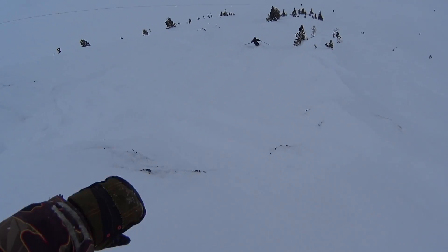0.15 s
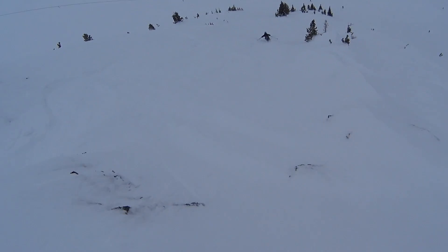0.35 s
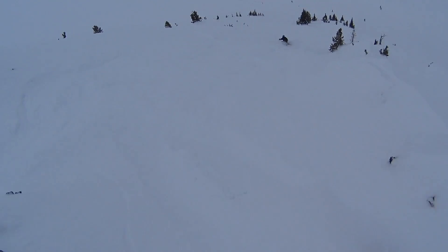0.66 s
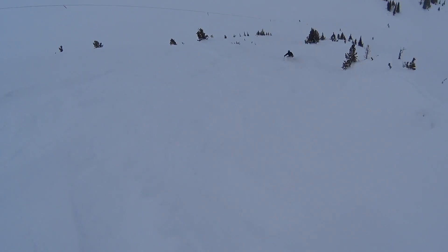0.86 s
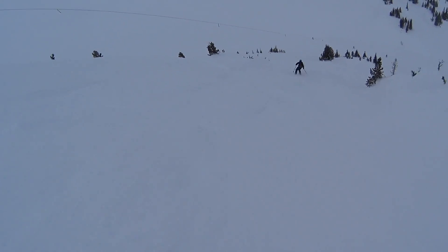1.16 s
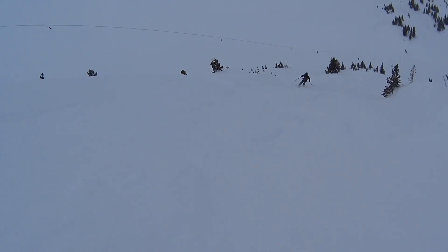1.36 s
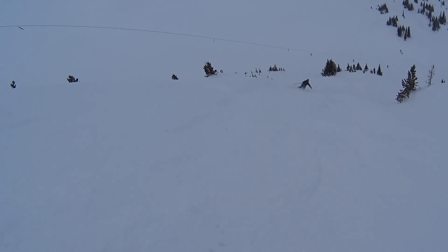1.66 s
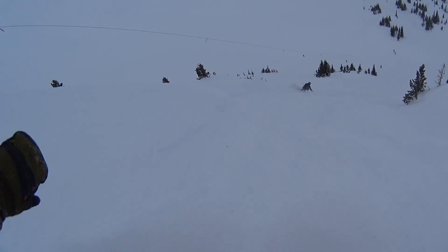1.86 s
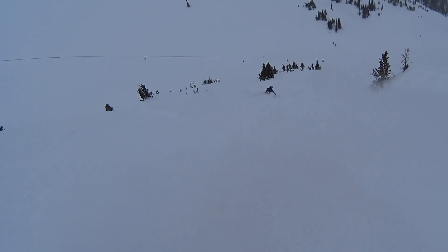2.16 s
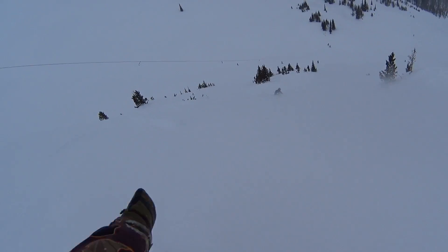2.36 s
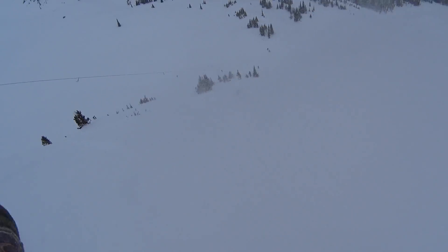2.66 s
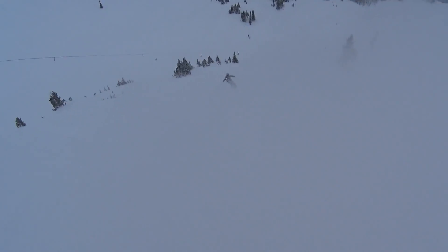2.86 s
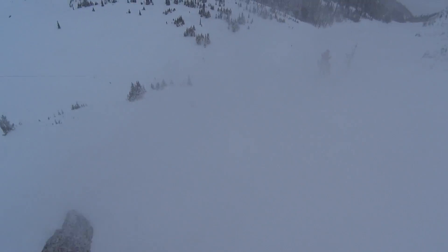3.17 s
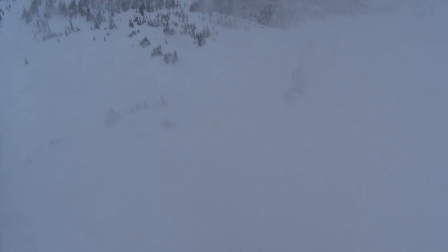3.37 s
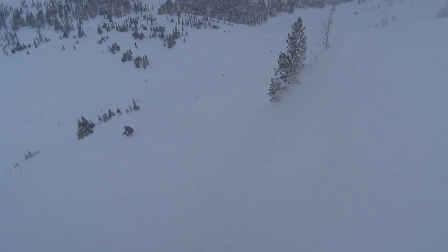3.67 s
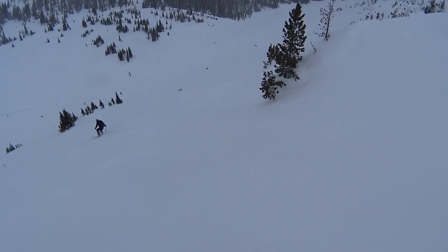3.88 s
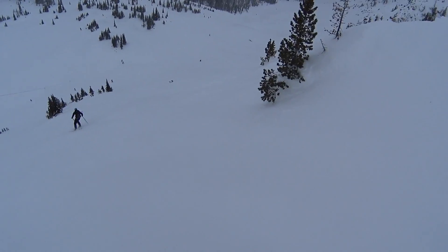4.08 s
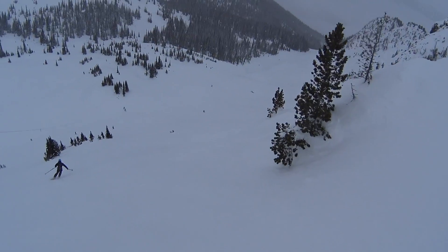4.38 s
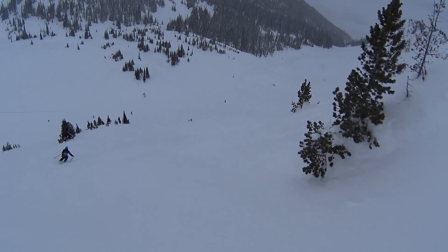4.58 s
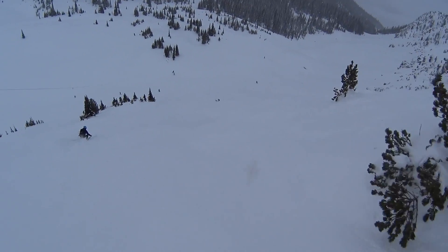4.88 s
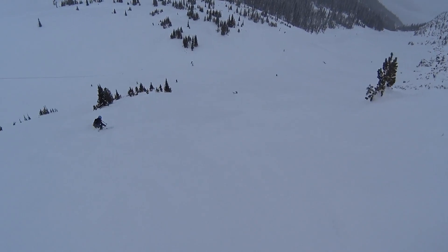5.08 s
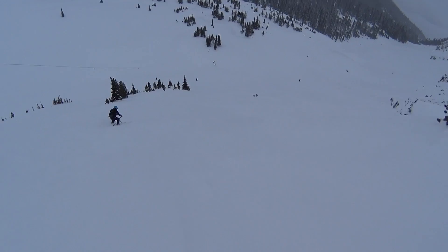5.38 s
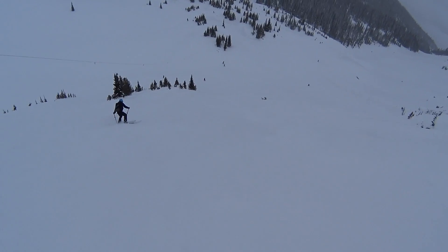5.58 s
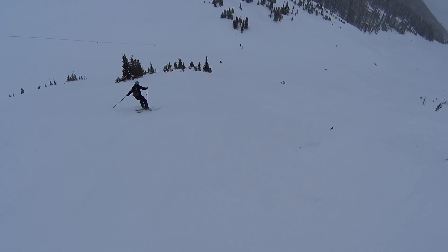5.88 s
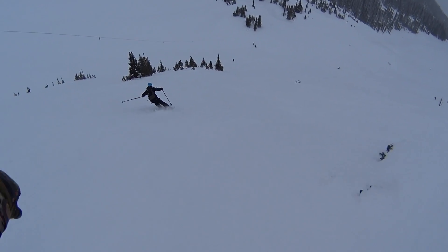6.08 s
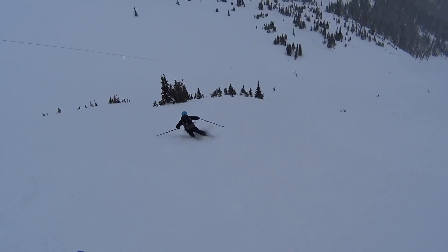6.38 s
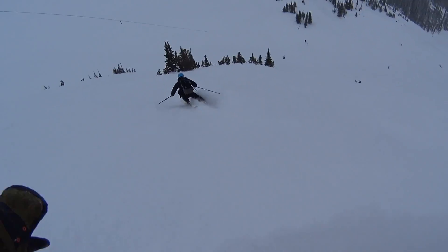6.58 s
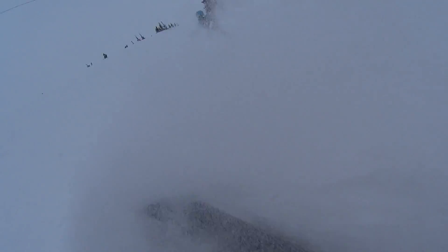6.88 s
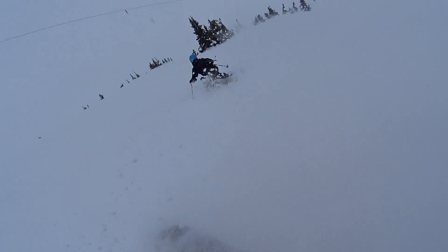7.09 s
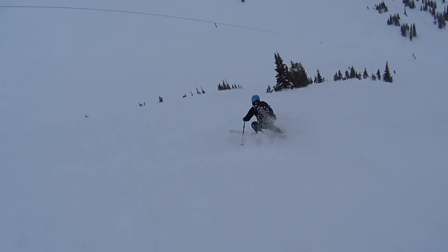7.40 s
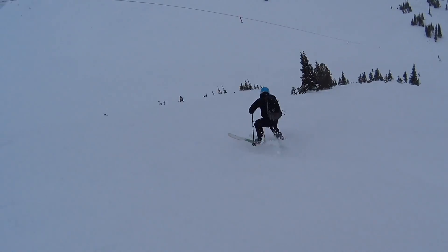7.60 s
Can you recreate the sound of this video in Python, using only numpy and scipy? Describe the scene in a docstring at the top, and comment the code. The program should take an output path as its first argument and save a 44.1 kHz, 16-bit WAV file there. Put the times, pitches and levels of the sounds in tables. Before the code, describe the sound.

Skiing through deep powder, heard from a body-worn camera in a plastic case. Swishing rumble follows the speed and each turn hisses. Plastic ticks and knocks come early; around three seconds snow pellets crackle sharply over the microphones. A quieter glide follows, then speed builds to a heavy thump at six and a half seconds, more knocks and a short spray. Open slope, no echo, faint low wind.

```python
"""Open slope, no echo: skiing through deep powder with a body-worn camera in a plastic case.
The skis rumble and swish (coloured noise that follows the speed); each turn throws up hissing powder.
Over bumps the camera mount knocks and rattles (damped modes struck by short forces).
Twice the skier rides through a cloud of snow that pelts the case and the microphone ports.
A faint low wind stays under it all; a limiter ducks after hard hits."""
import sys
import numpy as np
from scipy import signal
from scipy.fft import rfft, irfft
from scipy.io import wavfile
from scipy.ndimage import uniform_filter1d, minimum_filter1d

SR = 44100
rng = np.random.default_rng(int(sys.argv[2]) if len(sys.argv) > 2 else 0)


def unload_audio(sound):
    """Save the sound as a 16-bit wav file, at the path given as the first command line argument."""
    columns = np.transpose(np.atleast_2d(sound))
    # keep every value between -1 and 1, then stretch to whole-number steps
    steps = np.round(np.clip(columns, -1, 1) * 32767)
    wavfile.write(sys.argv[1], SR, steps.astype(np.int16))


N = 341334

# Ringing modes of the plastic case. Each row: frequency in Hz, relative level in dB, t60 in seconds.
CASE_MODES = [(970, -6.5, 0.011), (1347, 0.5, 0.013), (1622, 4.5, 0.016), (1859, 1.5, 0.014),
              (2424, -1, 0.016)]
# Ringing modes of a microphone port. Each row: frequency in Hz, relative level in dB, t60 in seconds.
PORT_MODES = [(2550, -6.5, 0.0095), (3740, 3.5, 0.0018), (4610, 2, 0.0029), (6460, -3, 0.0014),
              (10530, -17, 0.0068), (13400, -21.5, 0.0023)]
# Clouds of powder ridden through. Each row: start in seconds, end in seconds,
# relative level of pellets on the ports in dB, relative level of fine snow on the case in dB.
CLOUDS = [(2.899, 3.291, -8, -37), (3.319, 3.6, -2.5, -32.5), (3.62, 3.882, -5, -38),
          (7.039, 7.098, -5, -32)]


def gain_of(db):
    """Decibels to amplitude."""
    return 10 ** (np.asarray(db) / 20)


def evened(x):
    """Scaled to rms 1."""
    return x / np.sqrt(np.mean(x ** 2) + 1e-20)


def peaked(x):
    """Scaled to peak 1."""
    return x / (abs(x).max() + 1e-20)


def read(points, hz):
    """A spectrum read on a log-frequency axis."""
    f, value = np.transpose(points)
    return np.interp(np.log(hz + 1), np.log(f + 1), value)


def add(mix, s, sound):
    """Adds a sound to the stereo mix at time s."""
    part = mix[:, max(round(s * SR), 0):][:, :sound.shape[-1]]
    part += sound[..., :part.shape[1]]


def times(start, end, per_s, evenness=2.3):
    """Uneven moments between start and end, roughly per_s a second."""
    at = start + (np.cumsum(rng.weibull(evenness, 128)) - 0.5) / per_s
    return at[(at >= start) & (at < end)]


def fade_db(start, end, rise_db_per_s, fall_db_per_s):
    """Rises to 0 dB at start, holds until end and falls."""
    t = np.arange(N) / SR
    return -rise_db_per_s * np.maximum(start - t, 0) - fall_db_per_s * np.maximum(t - end, 0)


def ring(modes, stretch=1, size=4096):
    """The answer of a body to one blow: decaying sines of alternating sign, pitch scaled by stretch."""
    t = np.arange(size) / SR
    total = np.zeros(size)
    for k, (hz, db, t60) in enumerate(modes):
        decay = gain_of(db - 60 * t / t60)
        total += (-1) ** k * decay * np.sin(2 * np.pi * hz * stretch * t)
    return peaked(total)


def rush(colour, patchy_db, flutter_db, size=512):
    """Noise at two close ports, partly alike, with drifting spectral patches and a broadband flutter."""
    # Each row: frequency in Hz, left-right likeness from 0 to 1.
    alike = [(60, 0.98), (130, 1), (290, 0.99), (640, 0.88), (1410, 0.96), (3100, 1), (6820, 0.92),
             (15000, 1)]
    hop = size // 4
    hz, frames = np.fft.rfftfreq(size, 1 / SR), N // hop + 5
    a, b, c, d, patches = rng.standard_normal((5, frames, len(hz)))
    patches = evened(uniform_filter1d(uniform_filter1d(patches, size=14, axis=0), size=9, axis=1))
    flutter = evened(uniform_filter1d(rng.standard_normal(frames), size=6))[:, None]
    same = read(alike, hz)
    left = a + 1j * b
    right = same * left + np.sqrt(1 - same ** 2) * (c + 1j * d)
    level_db = read(colour, hz) + patchy_db * patches + flutter_db * flutter
    spectra = np.array([left, right]) * gain_of(level_db)
    noise = signal.istft(spectra.swapaxes(1, 2), nperseg=size, noverlap=size - hop)[1]
    return evened(noise[:, :N])


def wind(level_db=-55):
    """A faint low flutter of air brushing past the case, steady whatever the skis do."""
    # Each row: frequency in Hz, relative density in dB per Hz.
    wind_colour = [(20, 1), (75, 0), (140, -10.5), (400, -40), (1000, -70)]
    return gain_of(level_db) * rush(wind_colour, patchy_db=5.0, flutter_db=2.5, size=2048)


def lumps():
    """Soft lumps of snow shove the whole camera: a dull push with no ring."""
    # Each row: time in seconds, relative peak in dB, time constant of the push in seconds.
    shoves = [(3.176, -10, .0006), (3.4971, -11, .0011), (6.54, -12.5, 0.0026)]
    out = np.zeros((2, N))
    for s, db, push_s in shoves:
        u = np.arange(2048) / SR / push_s
        add(out, s, gain_of(db) * peaked(u * (2 - u) * np.exp(-u)))
    return out


def grains(modes, per_s, spread_db, across, count):
    """Snow grains of uneven size land left or right, on four spots that ring a little differently."""
    sizes = gain_of(spread_db * np.minimum(rng.exponential(1, (2, count)), 3))
    sizes = sizes * rng.choice([-1, 1], (2, count))
    landed = rng.random((2, count)) < per_s / SR
    hits = sizes * landed * signal.windows.tukey(count, 0.15)
    hits = hits + across * hits[::-1]
    spot = rng.integers(0, 4, count)
    total = 0
    for k, stretch in enumerate(rng.uniform(0.906, 1.119, size=4)):
        answer = ring(modes, stretch, size=512)[None]
        total = total + signal.fftconvolve(hits * (spot == k), answer, axes=1)
    return evened(total)


def showers(port_db=6.0, case_db=-2.0, fine_db=-35.0):
    """Fine snow patters on ports and case all through a cloud, and more loudly where a clump bursts."""
    # Clumps bursting over the camera. Each row: start in seconds, length in seconds,
    # relative level on the ports in dB, relative level on the case in dB.
    clumps = [(2.854, 0.071, -31.5, -25.5), (2.996, 0.057, -29.5, -34.5), (3.182, .031, -24, -25.5),
              (3.428, 0.065, -19, -28), (3.711, 0.032, -24, -26), (3.795, 0.099, -30.5, -33.5),
              (6.438, 0.019, -49, -19), (6.468, 0.024, -24.5, -7), (7.023, 0.12, -35.5, -24.5),
              (7.175, 0.027, -48, -22)]
    # Thin lens window, reached by snow only. Each row: frequency in Hz, relative level in dB, t60 in seconds.
    window_modes = [(2950, 0, 0.0093), (4700, 3, 0.0044)]
    out = np.zeros((2, N))
    drizzle = [(start, end - start, db + fine_db, on_case_db) for start, end, db, on_case_db in CLOUDS]
    for start, length_s, on_port_db, on_case_db in clumps + drizzle:
        count = max(round(length_s * SR), 256)
        on_port = grains(PORT_MODES, per_s=710, spread_db=8.0, across=0.061, count=count)
        add(out, start, gain_of(on_port_db + port_db) * on_port)
        on_case = grains(CASE_MODES + window_modes, per_s=1400, spread_db=9.5, across=0.72, count=count)
        add(out, start, gain_of(on_case_db + case_db) * on_case)
    return out


def pellets(level_db=0.5, far_db=-12.0, slosh_db=-3.0, thud=0.07, thud_s=0.00023, vary_db=2.0):
    """Each pellet pings a port with its own colour; the lowest mode is air sloshing to the other port."""
    # Pellets heard singly, hard and soft. Each row: time in seconds, relative level in dB.
    single = [(1.3586, -7), (2.8351, 3), (2.8565, 4), (2.918, 1), (2.9494, -2), (2.9789, 6), (3.0225, 1),
              (3.1376, 0), (3.3149, -5), (3.5204, 4), (3.6145, -4), (3.7, 4.5), (3.76, 3.5), (3.8982, -2)]
    rough_per_s, spread_db = 62, 3.5
    out, t = np.zeros((2, N)), np.arange(512) / SR
    hail = []
    for start, end, db, _ in CLOUDS:
        for s in times(start, end, rough_per_s):
            hail.append((s, db + spread_db * rng.standard_normal()))
    strikes = single + hail
    sides = rng.permutation(len(strikes)) % 2
    for (s, db), side in zip(strikes, sides):
        pitch, *colour = rng.standard_normal(1 + len(PORT_MODES))
        stretch = 1 + 0.03 * pitch
        modes = [(hz, mode_db + vary_db * c, t60) for (hz, mode_db, t60), c in zip(PORT_MODES, colour)]
        ping = ring(modes[1:], stretch, size=512)
        slosh = -gain_of(slosh_db + vary_db * colour[0]) * ring(modes[:1], stretch, size=512)
        # the thud grows faster than the ping: hard strikes thud more
        near = ping + slosh + thud * gain_of(db) * np.exp(-t / thud_s)
        far = gain_of(far_db) * (ping + np.roll(slosh, 6))  # slosh arrives 6 samples late
        pair = np.array([near, far] if side > 0 else [far, near])
        add(out, s, gain_of(db + level_db) * pair)
    return out


def clack(rebound, contact_s=0.0015, chatter=0.41, gap_s=0.00468, apart=0.32, soft_hz=3600, size=1024):
    """Plastic scrapes on plastic for an instant and rebounds once; the case rings."""
    t = np.arange(size) / SR
    length_s = contact_s * rng.uniform(0.84, 1.327)
    u = t / length_s
    late = np.maximum(t - gap_s * rng.uniform(0.72, 1.26), 0) / length_s
    contact = 2 * u * np.exp(-2 * u) + rebound * 2 * late * np.exp(-2 * late)
    scrape = rng.standard_normal(size) + apart * rng.standard_normal((2, size))
    force = 2 * chatter * contact * scrape
    force[:, np.argmax(contact)] += 1
    # plastic gives way: no sharp click
    force = signal.sosfilt(signal.butter(2, soft_hz, fs=SR, output="sos"), force)
    answer = ring(CASE_MODES, rng.uniform(0.916, 1.058), size=size)[None]
    return peaked(signal.fftconvolve(force, answer, axes=1))


def ticks(scratch_db=-21.0, scratch_growth=0.77, scratch_s=0.0035, low_hz=2600, high_hz=6000):
    """Loose gear ticks on the case, with a brief treble scratch that stands out more in faint ticks."""
    # Ticks heard singly, strong and faint. Each row: time in seconds, relative peak in dB.
    single = [(0.654, -9.5), (0.8145, -9.5), (1.0058, -5.5), (1.056, -5), (1.2993, -4), (1.317, -6),
              (1.3844, -5.5), (1.4513, -12.5), (2.2, -19), (2.4026, -17), (2.468, -20), (2.5238, -21.5),
              (2.5619, -18), (2.5836, -9), (2.6955, -12), (2.707, -5.5), (4.0298, -23.5), (4.082, -14),
              (4.187, -27), (4.2394, -21), (4.945, -19), (5.5549, -4.5), (5.9723, -10.5), (6.2344, -8.5),
              (6.369, -8), (6.511, -2.5), (6.5326, -5.5), (6.961, -10.5), (7.011, -5.5), (7.1271, -13),
              (7.215, -10.5), (7.304, -11.5), (7.3635, -15.5), (7.436, -14), (7.497, -7)]
    # Light rattling on choppy snow. Each row: start in seconds, end in seconds, relative peak in dB.
    chop = [(1.98, 2.65, -26), (6.55, 7.0, -15.5), (7.327, 7.47, -16)]
    rough_per_s, spread_db = 14, 1.5
    out, t = np.zeros((2, N)), np.arange(1024) / SR
    band = signal.butter(3, [low_hz, high_hz], "band", fs=SR, output="sos")
    rattles = []
    for start, end, db in chop:
        for s in times(start, end, rough_per_s):
            rattles.append((s, db + spread_db * rng.standard_normal()))
    for s, db in single + rattles:
        add(out, s, gain_of(db) * clack(rebound=0.33, contact_s=0.0012))
        noise = rng.standard_normal(len(t)) + 0.5 * rng.standard_normal((2, len(t)))
        scratch = evened(signal.sosfilt(band, noise)) * np.exp(-t / scratch_s)
        add(out, s, gain_of(scratch_growth * db + scratch_db) * scratch)
    return out


def swing(t60, mount_hz=137.5, rise_s=0.0011):
    """The heavy camera swings on its mount; the stop takes hold softly."""
    t = np.arange(6000) / SR
    hz = mount_hz * rng.uniform(0.97, 1.03)
    rise = 1 - np.exp(-t / rise_s)
    decay = gain_of(-60 * t / max(t60, 0.01))
    return peaked(rise * np.cos(2 * np.pi * hz * (t - rise_s)) * decay)


def knocks(flex_db=15.5, clack_db=5.0, buckle_db=-25.0, lag_s=0.0021, vary_db=2.5, rock_s=0.000063):
    """A bump claps the case and flexes the arm; the mount swings a moment later, a buckle rings faintly."""
    # Mount hits its stop. Each row: time in seconds, swing peak in dB, clack in dB relative to the swing.
    bumps = [(0.343, -18, -13), (1.042, -11.5, -10), (1.349, -18.5, -12), (1.926, -23, 3), (1.958, -32, 3),
             (2.16, -32.5, -7), (2.629, -35.5, 4), (2.767, -17.5, -1), (3.175, -18, 2), (3.495, -13, -3.5),
             (3.779, -18, -0.5), (4.857, -17.5, -7.5), (5.25, -15.5, -4.5), (5.42, -9.5, -5),
             (5.7, -14, -3.5), (6.256, -26.5, 3), (6.421, -23.5, -15), (6.54, 0, -7.5), (6.554, -12, 1),
             (6.774, -3.5, -4), (6.809, -11.5, -12), (7.539, -7, -4)]
    # Light bumps mostly flex the arm, hard ones swing the mount.
    # Each row: swing in dB, flex in dB relative to the swing.
    arm_share = [(-24.5, -5), (-17.5, -15.5)]
    # Modes of arm and buckle. Each row: frequency in Hz, relative level in dB, t60 in seconds.
    arm_modes = [(360, 6.5, 0.05), (546, -15.5, 0.05), (703, 2.5, 0.017)]
    buckle_modes = [(1590, -15, 0.32), (1875, 16, 0.43)]
    full_scale_t60_s, t60_growth = 0.088, 0.17  # harder knocks swing longer: power of the strength
    case, mount = np.zeros((2, 2, N))
    for s, db, case_db in bumps:
        arm_db = np.interp(db, *np.transpose(arm_share))
        arm = [(hz, mode_db + vary_db * rng.standard_normal(), t60) for hz, mode_db, t60 in arm_modes]
        add(mount, s + lag_s, gain_of(db) * swing(full_scale_t60_s * gain_of(t60_growth * db)))
        add(mount, s + lag_s / 2, -gain_of(db + arm_db + flex_db) * ring(arm, rng.uniform(0.93, 1.085)))
        add(case, s, gain_of(db + case_db + clack_db) * clack(rebound=0.25))
        add(case, s, gain_of(db + buckle_db) * ring(buckle_modes, size=12000))
    # the mount rocks sideways: its thump reaches the left port a little late
    t = np.arange(N) / SR
    return case + np.array([np.interp(t - rock_s, t, mount[0]), mount[1]])


def skis(cruise_db=-42, glide_share_db=-1.5):
    """Rumble and swish follow the speed; in turns the edges bite, the bases press harder, powder hisses."""
    # Colours of the ride, gliding bases, biting edges and thrown powder.
    # Each row: frequency in Hz, relative density in dB per Hz.
    rumble_colour = [(20, 10), (60, -23), (125, 2), (260, -7), (360, 0), (520, -13), (1000, -6.5),
                     (1500, -19), (3000, -90)]
    glide_colour = [(200, -39), (600, -11.5), (1100, -12.5), (1320, 5.5), (1550, -0.5), (1800, 3),
                    (2020, -8), (2350, 3), (3200, -13.5), (4600, -8.5), (6300, -25), (10000, -50),
                    (16000, -71)]
    edge_colour = [(2500, -32), (3800, -9.5), (4600, 3.5), (5300, -9), (7000, -43), (10000, -60)]
    powder_colour = [(500, -20), (1300, -43), (2000, -37), (2600, 4.5), (3400, -3), (4800, 2), (6500, -6.5),
                     (9000, -16), (10500, -17.5), (12000, -32), (13200, -16), (14500, -24), (16000, -22)]
    # Speed, as the rumble it sends up through the body. Each row: time in seconds, rumble in dB.
    speed = [(0.0, -47.5), (0.46, -41), (1.05, -39), (1.42, -36), (2.1, -47), (2.55, -50), (2.78, -42.5),
             (3.0, -61), (4.12, -54.5), (4.7, -47), (5.2, -43.5), (5.7, -37), (6.2, -35), (6.48, -29.5),
             (6.68, -38), (6.9, -38), (7.15, -44), (7.74, -41)]
    # Each row: start in seconds, end in seconds, bite of the edges in dB, thrown powder in dB.
    turns = [(0.274, 0.273, -33, -29.5), (0.962, 1.43, -37.5, -46), (1.55, 1.678, -55, -34.5),
             (1.814, 2.125, -42, -34.5), (2.22, 2.32, -50, -42), (2.76, 3.86, -46, -42),
             (4.435, 4.488, -49.5, -67), (5.444, 5.55, -41.5, -60), (5.64, 6.09, -36, -70),
             (6.146, 6.216, -38, -36.5), (6.36, 6.463, -36, -34.5), (6.673, 6.714, -36.5, -35.5),
             (6.924, 7.164, -39.5, -32), (7.58, 7.59, -47, -37.5)]
    # Firmer snow, less powder between turns. Each row: start in seconds, end in seconds, change in dB.
    firm = [(3.94, 6.0, -6.5)]
    # (dB at cruising speed, dB gained per dB of speed rumble): rumble, glide, edges, powder
    laws = (-41, 0.94), (-37, 0.99), (-49, 1), (-43.5, 0.1)
    bite_db_per_s, settle_db_per_s = 128, 67  # turns swell quickly, settle slowly

    speed_db = np.interp(np.arange(N) / SR, *np.transpose(speed)) - cruise_db
    rumble, glide, edges, powder = (gain_of(db + slope * speed_db) for db, slope in laws)
    for start, end, db in firm:
        amount = gain_of(fade_db(start, end, bite_db_per_s, bite_db_per_s))
        powder = powder * gain_of(db * amount)
    for start, end, edge_db, powder_db in turns:
        turn = gain_of(fade_db(start, end, bite_db_per_s, settle_db_per_s))
        edges = np.hypot(edges, gain_of(edge_db) * turn)
        powder = np.hypot(powder, gain_of(powder_db) * turn)
    glide = np.hypot(glide, gain_of(glide_share_db) * edges)
    out = rumble * rush(rumble_colour, patchy_db=2.0, flutter_db=2.54, size=1024)
    out += glide * rush(glide_colour, patchy_db=1.9, flutter_db=1.6)
    out += edges * rush(edge_colour, patchy_db=1.4, flutter_db=2.5)
    out += powder * rush(powder_colour, patchy_db=2.05, flutter_db=2.0)
    return out


def through_case(x):
    """The case passes each band to the two ports with a different lead and strength."""
    # Each row: frequency in Hz, lead of the left port in radians.
    lead = [(60, 0.21), (140, -0.12), (350, -0.24), (620, -0.41), (1050, -1.4), (1300, -0.55),
            (1800, -0.58), (2600, -1.14), (3100, -0.85), (3700, 0.5), (6000, -0.064)]
    # Each row: frequency in Hz, left minus right in dB.
    balance = [(140, 0.3), (600, -1.1), (1600, 0.1), (2600, 0.2), (5000, -2.6), (9000, -1.5)]
    hz = np.fft.rfftfreq(N, 1 / SR)
    half = gain_of(read(balance, hz) / 2) * np.exp(0.5j * read(lead, hz))
    return irfft(rfft(x) * np.array([half, 1 / half]), N)


def scene():
    """All but the pellets comes through the case; pellets strike the ports directly."""
    cased = skis() + wind() + knocks() + lumps() + showers() + ticks()
    return through_case(cased) + pellets()


def microphones(air, low_hz=70, narrow_hz=7000):
    """The two capsules cut the deep bass; the image narrows in the treble."""
    left, right = signal.sosfilt(signal.butter(2, low_hz, "high", fs=SR, output="sos"), air)
    mid, side = (left + right) / 2, (left - right) / 2
    hz = np.fft.rfftfreq(N, 1 / SR)
    side = irfft(rfft(side) / np.sqrt(1 + (hz / narrow_hz) ** 4), N)
    return np.array([mid + side, mid - side])


def record(dry, limit_db=-3.0, recovery_db_per_s=172.0, edge_hz=16300):
    """A peak limiter ducks at once and recovers at a steady rate in dB; then a low-pass band limit."""
    sound = microphones(dry)
    peak_db = 20 * np.log10(abs(sound).max(0) + 1e-9)
    fall_db = np.arange(N) * recovery_db_per_s / SR
    held_db = np.maximum.accumulate(peak_db + fall_db) - fall_db
    over_db = np.maximum(held_db - limit_db, 0)
    duck_db = uniform_filter1d(minimum_filter1d(-over_db, size=24), size=24)
    ducked = sound * gain_of(duck_db)
    low_pass = signal.firwin(255, edge_hz, window=("kaiser", 9), fs=SR)
    return signal.oaconvolve(ducked, low_pass[None], "same")


dry = scene()
out = record(dry)
unload_audio(out)
```